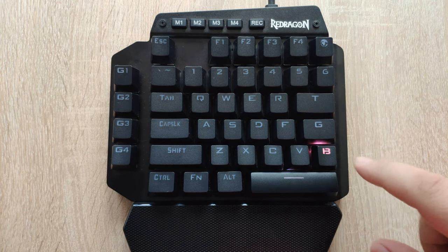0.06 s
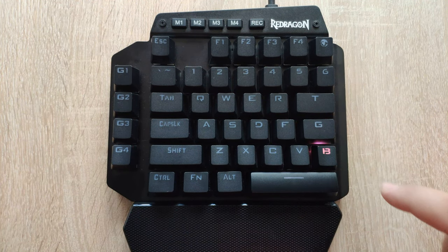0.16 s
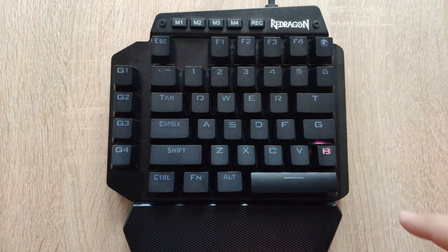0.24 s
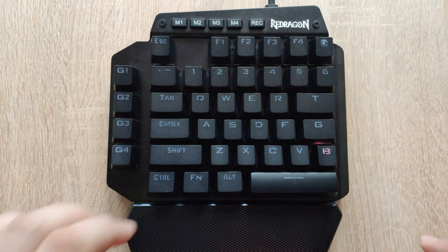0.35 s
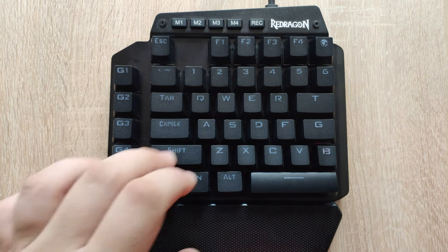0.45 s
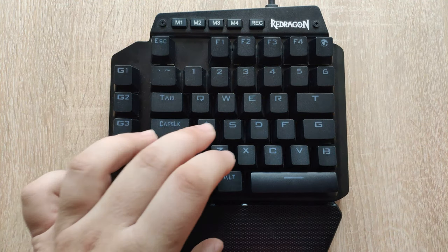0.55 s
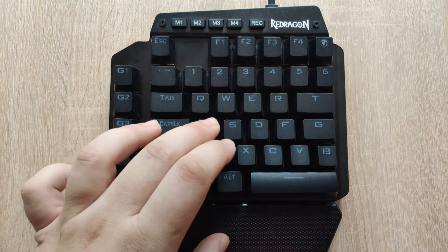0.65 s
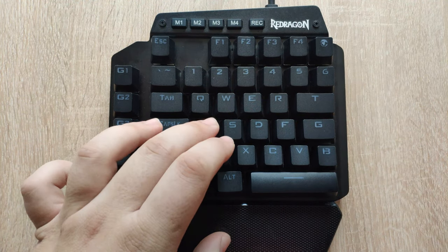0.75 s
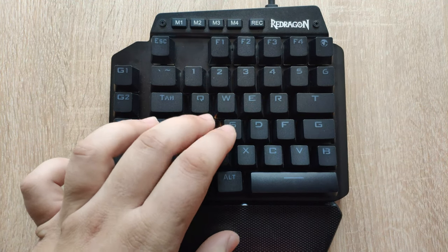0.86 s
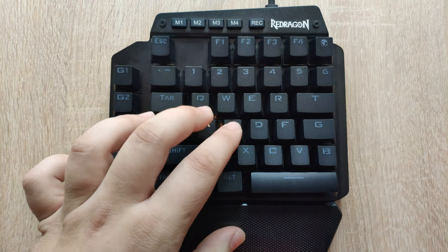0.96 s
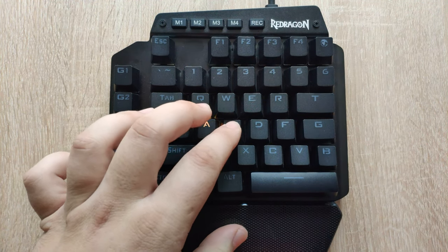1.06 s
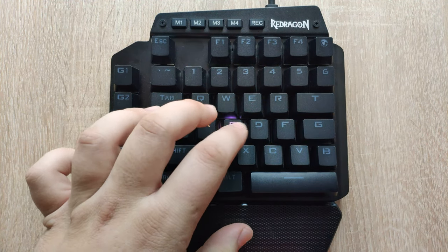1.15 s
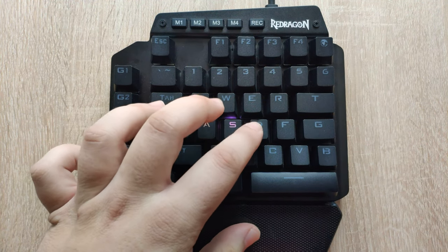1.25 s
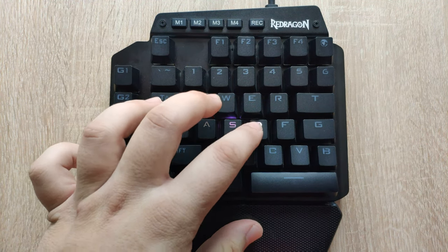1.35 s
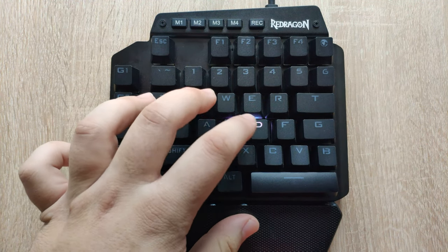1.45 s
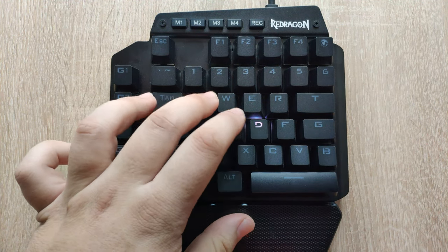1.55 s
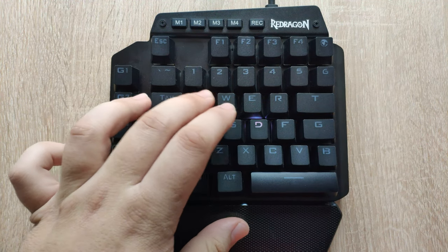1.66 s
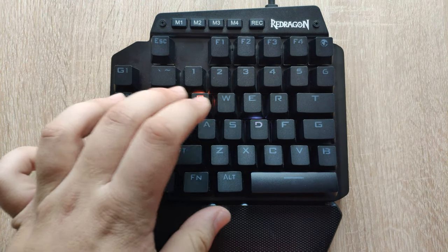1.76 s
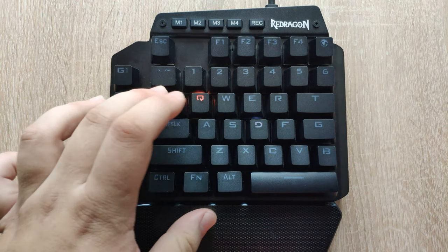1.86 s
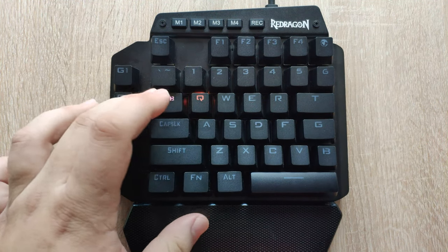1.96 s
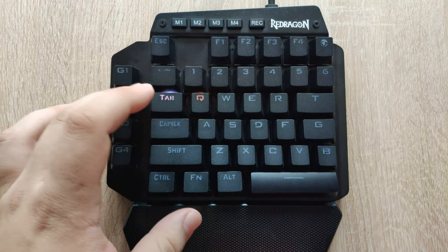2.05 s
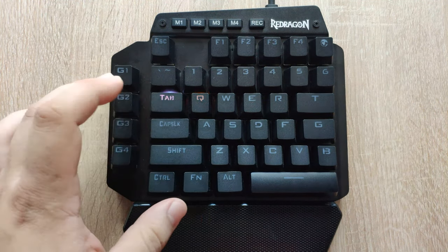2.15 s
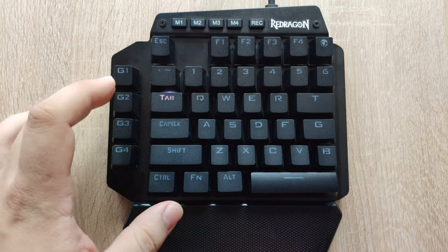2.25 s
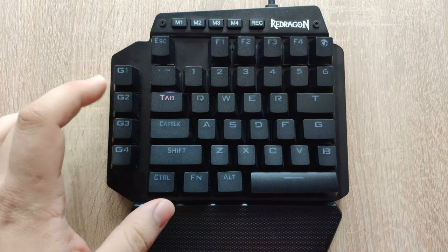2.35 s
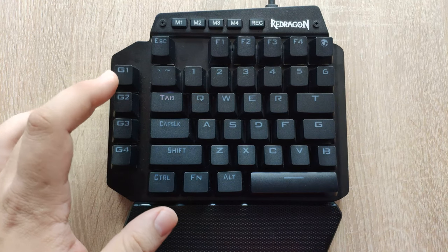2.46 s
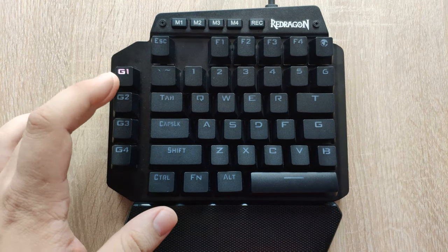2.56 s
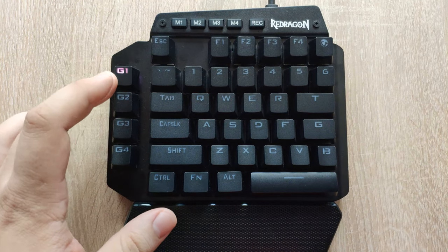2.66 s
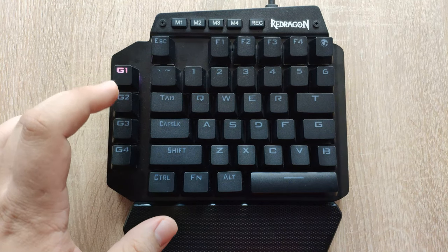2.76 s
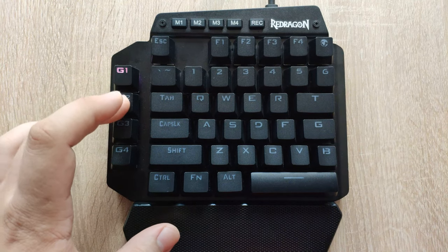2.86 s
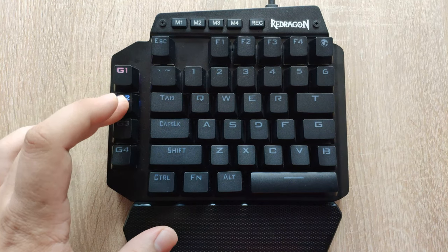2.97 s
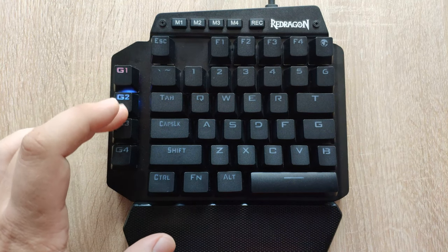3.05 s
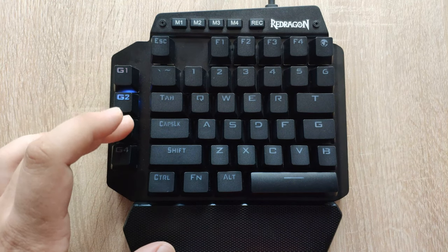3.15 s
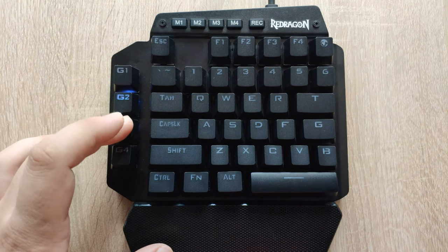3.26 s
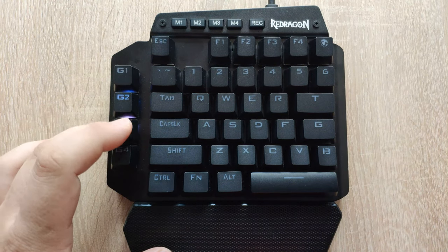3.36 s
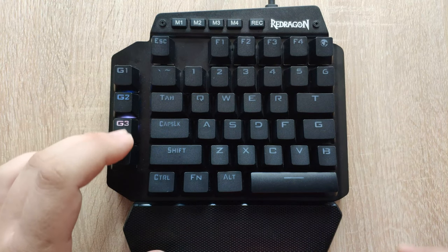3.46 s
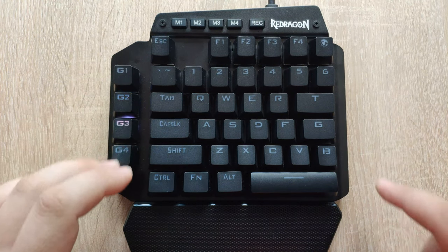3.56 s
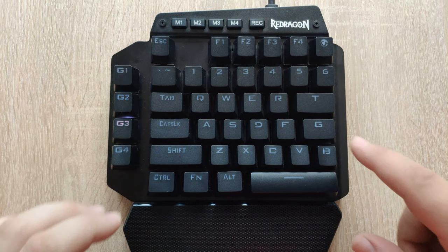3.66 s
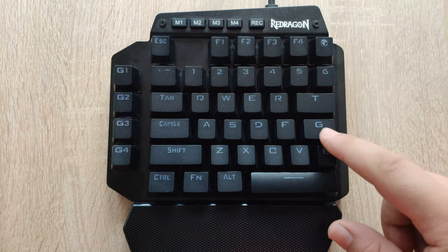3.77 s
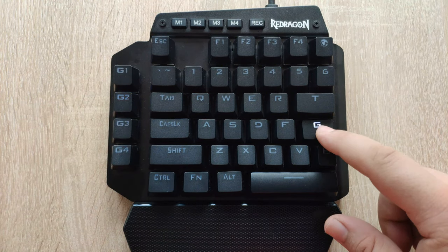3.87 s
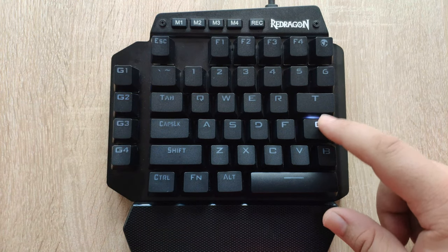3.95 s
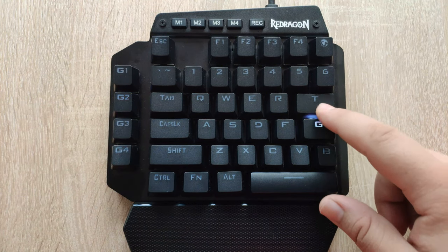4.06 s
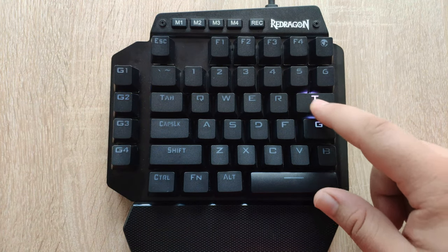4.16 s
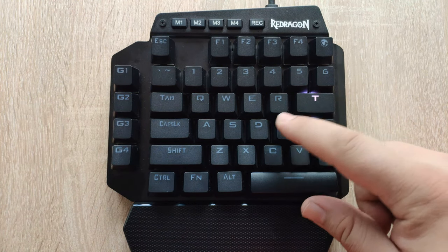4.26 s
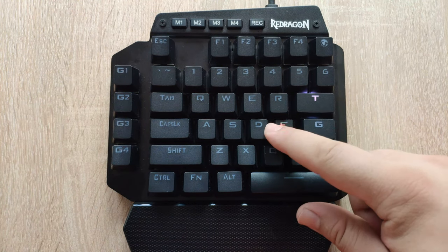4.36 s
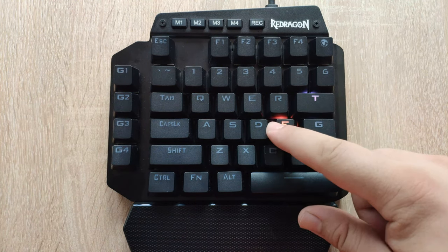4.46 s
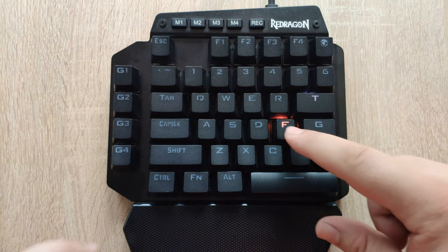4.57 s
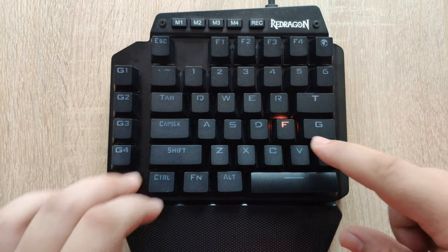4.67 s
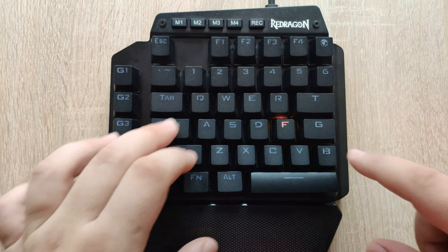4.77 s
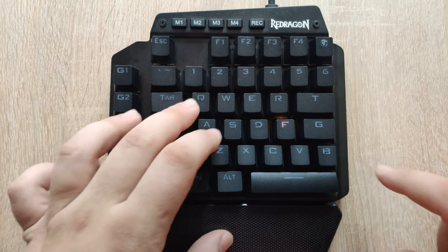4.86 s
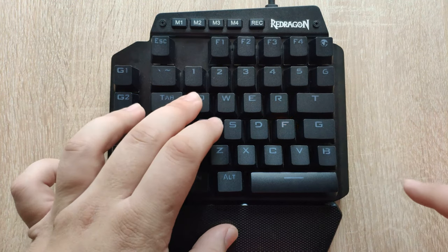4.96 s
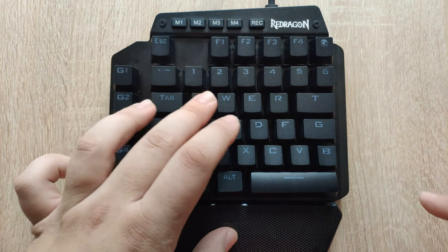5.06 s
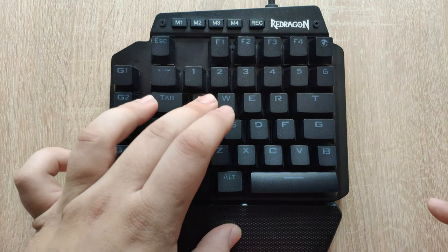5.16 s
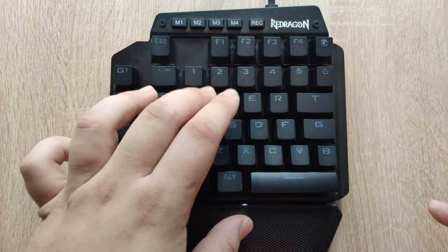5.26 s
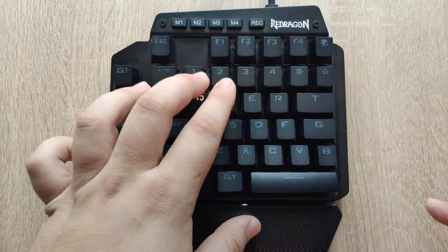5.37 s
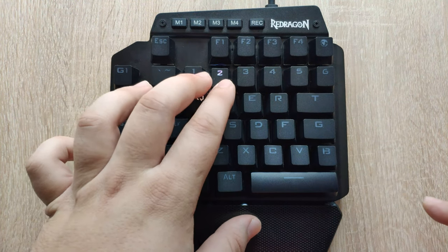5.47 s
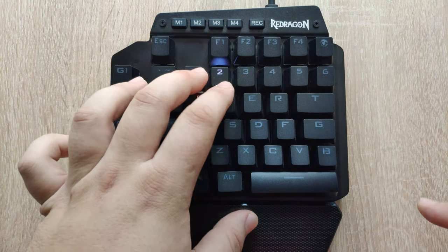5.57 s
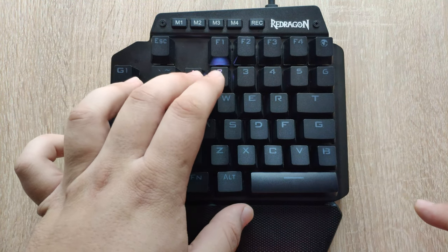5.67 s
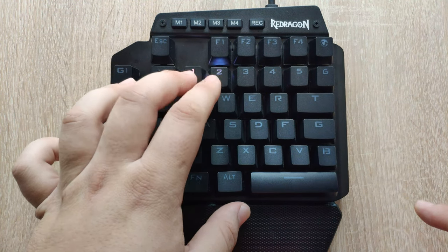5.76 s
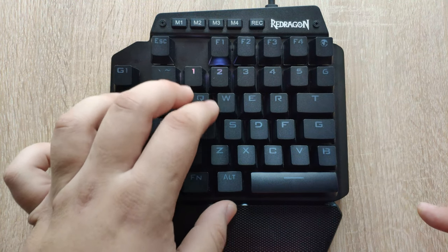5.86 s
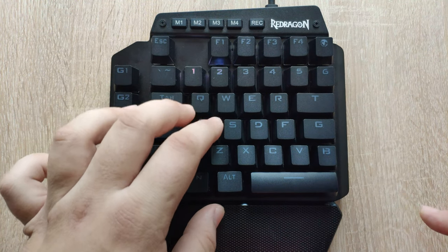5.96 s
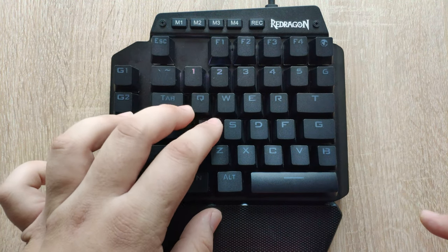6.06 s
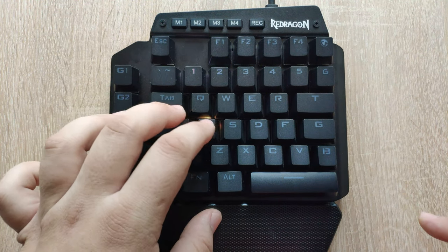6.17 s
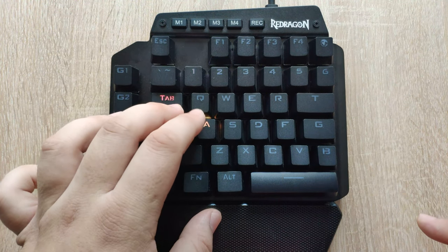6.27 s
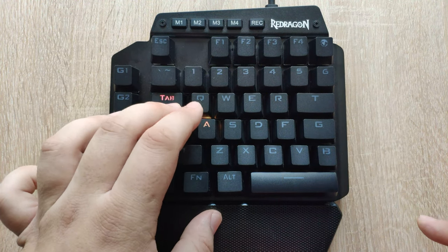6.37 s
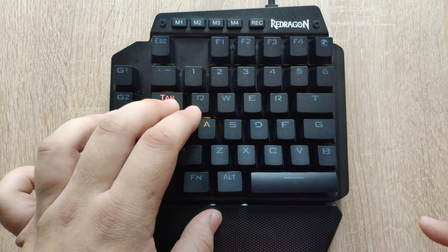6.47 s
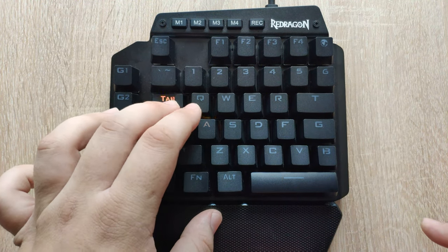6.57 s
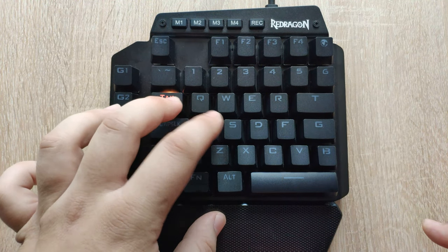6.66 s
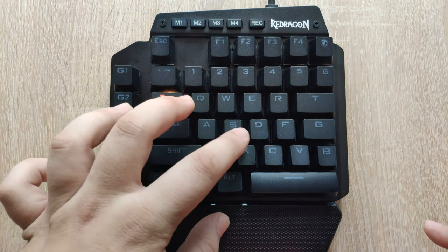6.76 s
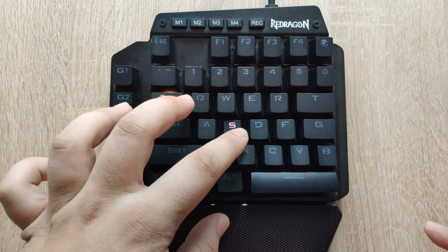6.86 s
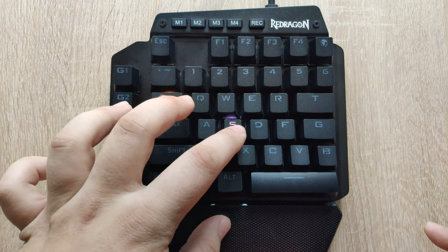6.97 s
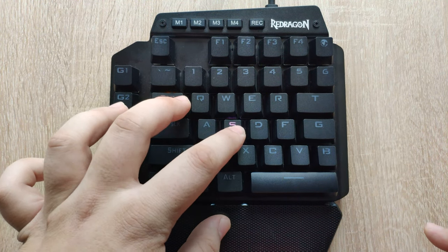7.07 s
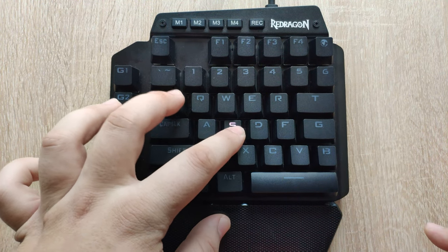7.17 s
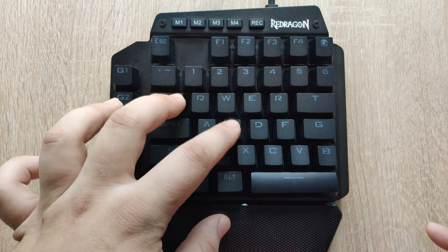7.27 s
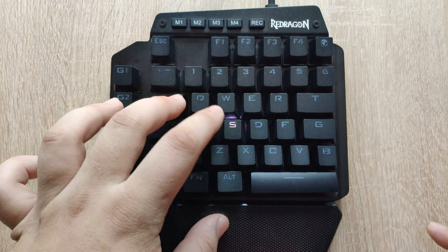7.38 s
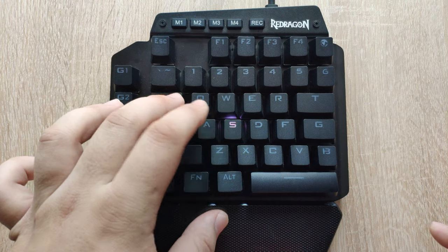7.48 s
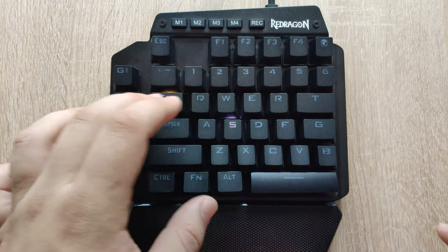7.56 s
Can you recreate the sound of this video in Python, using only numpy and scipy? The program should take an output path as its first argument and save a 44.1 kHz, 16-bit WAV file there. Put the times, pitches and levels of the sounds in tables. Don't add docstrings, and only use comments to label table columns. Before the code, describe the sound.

Close above a clicky mechanical keypad on a wooden desk in a small room, faint mains hum and hiss lie underneath. At the very start a key springs up with a weak knock, then the background sinks until about 0.7 s. Single presses follow at roughly 0.75, 1.05, 1.35, 1.65 and 2.0 s, then 2.6, 2.95 and 3.25 s: each a very bright, short snap, often with a dull plastic bottoming knock, then a softer release clack with a tiny tick. A brief hush near 3.8 s gives way to presses at 3.9, 4.15 and 4.45 s. Another lull falls around 4.7-4.9 s, before faint touches and releases. From 5.2 s snaps return, irregularly two to four a second, until 7.4 s, with a final soft release near 7.6 s. Finger nudges and loose ticks fill the gaps; a short diffuse room tail follows each click.

```python
import sys
import numpy as np
from scipy import signal
from scipy.fft import rfft, irfft, next_fast_len
from scipy.io import wavfile

SR = 44100
rng = np.random.default_rng(int(sys.argv[2]) if len(sys.argv) > 2 else 0)


def to_wav(s):
    ch = np.atleast_2d(s).T
    pcm = np.round(np.clip(ch, -1, 1) * 32767)
    wavfile.write(sys.argv[1], SR, pcm.astype(np.int16))


def attenuation_scalar(level_db):
    decades = np.asarray(level_db, float) / 20
    return 10 ** decades


N = 336042

# (time [s], strength [dB], ring [Hz], left-right [dB], housing share [dB])
PRESSES = [(0.7461, -11, 8580, -10, -4), (1.0509, -7, 8560, -11.5, -17.5), (1.346, -8, 8230, -16.5, -12),
           (1.642, -7, 8020, -19, -18), (1.9738, -24.5, 6400, -4, 3.5), (1.9825, -12.5, 8530, -12.5, -1.5),
           (2.6087, -12, 8100, -6.5, -6), (2.9588, -11, 8570, -3, -5), (3.251, -7.5, 8690, -10.5, -5),
           (3.8903, -13.5, 9130, -8.5, 0), (4.1421, -14.5, 8510, -2, 1), (4.431, -7, 8140, -6.5, -14.5),
           (5.1858, -7.5, 8500, -12, -25.5), (5.5036, -11.5, 8090, -26, -15), (5.669, -11, 8590, -8, -7),
           (6.0742, -8.5, 8350, -13, -9.5), (6.343, -12, 8170, -5, -0.5),
           (6.5769, -12.5, 8440, -10.5, -3.5), (6.8713, -13, 8070, -12, -14.5),
           (7.1791, -11.5, 8300, -8, -14), (7.369, -15.5, 8810, -4.5, -2)]
# (time [s], peak [dB], ring [Hz], low share [dB], tick [dB])
RELEASES = [(0.009, -40, 1460, -0.5, -43), (0.906, -26.5, 2160, -3.5, -47), (1.208, -17.5, 2467, -10, -27),
            (1.461, -22.5, 1420, -8, -37), (1.756, -23.5, 1070, -9.5, -34), (2.082, -22.5, 2200, -3, -39.5),
            (2.391, -31.5, 1735, -2.5, -50), (2.754, -26, 1740, -4, -39.5), (3.101, -28, 1460, -7, -46.5),
            (3.443, -30.5, 1460, -9, -43), (3.577, -28.5, 1844, -21.5, -38), (4.013, -28, 2480, -1, -36),
            (4.245, -27.5, 760, 1, -39), (4.495, -24.5, 1305, -24.5, -33.5),
            (4.523, -19.5, 2550, -7.5, -42), (4.896, -29.5, 2200, -3, -39.5), (5.083, -27, 1400, -19, -42),
            (5.31, -26.5, 2270, 1, -34.5), (5.836, -25, 2230, 0.5, -37.5), (6.193, -23.5, 1250, -8, -52.5),
            (6.484, -25.5, 2150, -3, -40), (6.707, -25.5, 2130, -3, -42.5), (7.009, -26, 2620, -6, -36),
            (7.575, -25.5, 1080, -3.5, -48.5)]
# (frequency [Hz], level [dB], t60 [s])
HOUSING_MODES = [(3770, -2.5, 0.0016), (4860, -4.5, 0.0018), (5940, -5, 0.0005), (6485, 2, 0.0023)]
# (frequency [Hz], level [dB], t60 [s])
CASE_MODES = [(340, -21.5, 0.008), (432, -11, 0.0077), (526, -5.5, 0.02), (644, 4, 0.027),
              (843, 3.5, 0.019), (1070, 8.5, 0.016), (1250, 0, 0.027), (1460, 6.5, 0.016)]
ROOM_SMOOTH_DB = -6


def at_hz(points, hz, axis=1):
    table = np.array(points)
    return np.interp(np.log(np.maximum(hz, 1)), np.log(table[:, 0]), table[:, axis])


def ring(push, hz, t60):
    r, w = attenuation_scalar(-60 / (t60 * SR)), 2 * np.pi * hz / SR
    return signal.lfilter([0, np.sin(w)], [1, -2 * r * np.cos(w), r * r], push + 1e-18)


def shaped(x, gain):
    size = next_fast_len(x.shape[-1])
    spectrum = rfft(x, size) * gain(np.fft.rfftfreq(size, 1 / SR))
    return irfft(spectrum, size)[..., :x.shape[-1]]


def peak_one(x):
    return x / np.abs(x).max()


def add(out, s, sound, pan_db):
    i = round(s * SR)
    out[:, i:i + len(sound)] += sound[:N - i] * attenuation_scalar(np.array([[.5], [-.5]]) * pan_db)


def contact(noise, rattle_s, rattle_db):
    push = attenuation_scalar(rattle_db) * noise * np.exp(-np.arange(len(noise)) / SR / rattle_s)
    push[0] = 1
    return push


def snap_rows():
    # (time [s], peak [dB])
    jacket_ticks = [(0.6738, -51), (0.8732, -33.5), (0.9867, -46.5), (1.038, -44.5), (1.3125, -39),
                    (1.5793, -37.5), (1.942, -61.5), (2.592, -52.5), (2.9117, -44), (3.0941, -29.5),
                    (3.4358, -42), (3.8544, -57), (3.8751, -44.5), (3.991, -34), (4.1076, -51),
                    (4.226, -28.5), (4.4087, -28.5), (4.518, -37), (4.9308, -42), (5.0379, -58.5),
                    (5.054, -42), (5.4262, -51), (5.6082, -39.5), (5.6476, -34.5), (5.814, -37),
                    (6.056, -54.5), (6.5678, -44), (6.8129, -43.5), (7.5386, -42), (7.5642, -38.5),
                    (1.189, -41.5),
        (1.44, -47),
        (2.72, -41),
        (4.846, -51),
        (5.88, -49.5),
        (6.161, -55),
        (6.46, -44.5),
        (6.69, -36),
        (6.98, -39),
        (7.345, -38),
    ]
    direct_db, direct_per_pan = 3, 0.45
    release_lead_s = .0015
    catch_lead_s, catch_spread_s, catch_db = .012, 0.0052, -40.5
    tick_hz, tick_spread_hz, tick_room_db, tick_housing_db = 8660, 750, 3, 1.5
    rows = []
    for s, db, hz, pan, housing_db in PRESSES:
        direct = direct_db + direct_per_pan * pan
        rows.append((s, db + direct, hz, pan, -direct, housing_db))
    ticks = jacket_ticks
    ticks += [(s - release_lead_s, tick_db) for s, *_, tick_db in RELEASES]
    for (s, db, *_), d in zip(PRESSES, rng.standard_normal(len(PRESSES))):
        ticks.append((s - catch_lead_s + catch_spread_s * d, db + catch_db))
    when, _, _, where, _ = np.transpose(PRESSES)
    for (s, db), d in zip(ticks, rng.standard_normal(len(ticks))):
        pan = np.interp(s, when, where)
        rows.append((s, db, tick_hz + tick_spread_hz * d, pan, tick_room_db, tick_housing_db))
    return rows


def snap(grit, own, hz, housing_db, top_db):
    push = contact(grit, 0.0017, -9.5)
    jacket = ring(ring(push, hz, 0.0017), hz, 0.0017)
    housing = 0
    for k, ((f, db, t60), d) in enumerate(zip(HOUSING_MODES, own)):
        housing = housing + attenuation_scalar(db + 1.5 * d) * ring((-1) ** k * push, f, t60)
    air = signal.butter(2, [10300, 17500], "band", fs=SR)
    top = signal.lfilter(*air, contact(grit[::-1], .0014, -7))
    return (peak_one(jacket) + attenuation_scalar(housing_db - 5.5) * peak_one(housing)
            + attenuation_scalar(0.19 * housing_db - 3 + top_db) * peak_one(top))


def snaps():
    top_per_pan = .3
    near, far = np.zeros((2, 2, N))
    rows = snap_rows()
    noise = rng.standard_normal((len(rows), 1500))
    spread = rng.standard_normal((len(rows), len(HOUSING_MODES)))
    for (s, peak_db, hz, pan_db, room_db, housing_db), grit, own in zip(rows, noise, spread):
        top_db = top_per_pan * pan_db
        direct = snap(grit, own, hz, housing_db, top_db)
        diffuse = snap(grit * attenuation_scalar(ROOM_SMOOTH_DB), own, hz, housing_db, top_db)
        add(near, s, attenuation_scalar(peak_db - 4.0) * direct, 1.08 * (pan_db + 7.5))
        add(far, s, attenuation_scalar(peak_db + room_db) * diffuse, 0)
    return near, far


def knock_rows():
    # (time [s], peak [dB], ring [Hz], low share [dB], room [dB])
    bottoms = [(0.761, -19.5, 2133, -11, -4.5), (1.063, -16.5, 2310, -15.5, -2.5),
               (1.997, -15, 2180, -16.5, -4.5), (2.624, -23, 1590, -22, -0.5),
               (2.975, -23, 1720, -40, -2.5), (3.261, -14, 1715, -25, -7.5), (3.903, -20, 2520, -8, -4),
               (4.158, -27, 2521, -3, 1.3), (5.656, -22.5, 1070, -11, -4), (5.699, -31, 2360, -9, -10),
               (6.088, -28, 1880, -15.5, -1.5), (6.59, -17, 2120, -12.5, -5.5),
               (7.196, -28, 2660, -9.5, -4.5), (7.38, -13, 2080, -15.5, -5)]
    # (time [s], peak [dB], ring [Hz], low share [dB])
    touches = [(0.673, -45, 1490, -14), (0.878, -41.5, 2580, -2), (0.986, -38, 1450, -4),
               (1.426, -44.5, 2460, 0), (1.578, -36.5, 2500, -2.5), (1.912, -30, 1070, -45),
               (2.531, -42, 1550, -14.5), (2.911, -40.5, 1460, -6), (3.203, -36, 1520, -12),
               (4.106, -36, 1100, -2), (4.24, -27, 2560, 3.5), (4.405, -36, 1460, -5.5),
               (4.487, -40.5, 2570, 2), (4.931, -35.5, 2220, 2), (5.04, -35, 2290, -1),
               (5.056, -35.5, 2400, 0), (5.073, -28, 2320, -8), (5.15, -38.5, 2410, -2),
               (5.434, -36.5, 1070, -9), (5.592, -41, 1340, -46), (5.635, -38, 2480, -2),
               (5.873, -41.5, 1030, 4), (5.883, -31.5, 1070, -6.5), (6.005, -42.5, 1520, -8),
               (6.176, -40, 2250, -6), (6.185, -30.5, 2190, -7), (6.813, -35, 2300, -2.5),
               (6.953, -39.5, 1550, -39), (7.229, -28.5, 2130, -0.3), (7.568, -28.5, 1080, -19)]
    jolt_lead_s = 0.001111
    jolt = (-35, 2310, -15, -2.5, -2)
    bottom_crackle_db = -18.5
    release_room_db, release_crackle_db = -4, -22.5
    touch_room_db, touch_crackle_db = -2.5, -23
    return ([(s - jolt_lead_s, *jolt) for s, *_ in PRESSES]
            + [(*row, bottom_crackle_db) for row in bottoms]
            + [(*row, release_room_db, release_crackle_db) for *row, _ in RELEASES]
            + [(*row, touch_room_db, touch_crackle_db) for row in touches])


def knock(grit, own, hz, low_db, crackle_db):
    soft = signal.butter(2, 3800, fs=SR)
    crisp = signal.butter(2, [3000, 6500], "band", fs=SR)
    airy = signal.butter(2, 6000, "high", fs=SR)
    push = signal.lfilter(*soft, contact(grit, 0.0069, -23.5))
    lag = round(max(round(.0016 * hz), 1) * SR / hz)
    push[lag:] += 0.16 * push[:-lag]
    cap = ring(ring(push, hz, 0.0035), hz, 0.0035) / 7
    cap = cap + attenuation_scalar(-4.5) * ring(push, 2270, 0.0064)
    cap = cap - attenuation_scalar(-1.0) * ring(push, 1100, 0.00054) - attenuation_scalar(-4) * ring(push, 3200, 0.00047)
    case = 0
    for (f, db, t60), d in zip(CASE_MODES, own):
        case = case + attenuation_scalar(db + 3 * d) * ring(np.sign(d) * push, f, t60)
    crackle = signal.lfilter(*crisp, contact(grit[::-1], .003, -13))
    age = np.arange(len(grit)) / SR / 0.0031
    scuff = signal.lfilter(*airy, grit) * age * np.exp(-age)
    crackle = peak_one(crackle) + attenuation_scalar(-6.5) * scuff
    return peak_one(cap) + attenuation_scalar(low_db + 3.5) * peak_one(case) + attenuation_scalar(crackle_db) * crackle


def knocks():
    # (frequency [Hz], level [dB], t60 [s])
    plate_modes = [(606, -36, 1.2), (1736, -48, .4), (2165, -46, .4), (2298, -42, .6)]
    room_crackle_db = -3.5
    near, far = np.zeros((2, 2, N))
    blows = np.zeros(N)
    rows = knock_rows()
    noise = rng.standard_normal((len(rows), 4000))
    spread = rng.standard_normal((len(rows), len(CASE_MODES)))
    for (s, peak_db, hz, low_db, room_db, crackle_db), grit, own in zip(rows, noise, spread):
        crackle_db = min(crackle_db, -3) + 9.5
        direct = knock(grit, own, hz, low_db, crackle_db)
        diffuse = knock(grit * attenuation_scalar(ROOM_SMOOTH_DB), own, hz, low_db, crackle_db + room_crackle_db)
        add(near, s + 0.001174, attenuation_scalar(peak_db - 5.5) * direct, -.8)
        add(far, s + 0.00117, attenuation_scalar(peak_db + room_db) * diffuse, 0)
        blows[round(s * SR)] = attenuation_scalar(peak_db + 3.0 + low_db)
    no_bass = signal.butter(2, 300, "high", fs=SR, output="sos")
    near, far = signal.sosfilt(no_bass, [near, far])
    plate = sum(attenuation_scalar(db) * ring(blows, f, t60) for f, db, t60 in plate_modes)
    return near + plate, far


def room(x):
    # (frequency [Hz], t60 [s])
    decay = [(300, 0.23), (800, 0.25), (2100, 0.49), (4000, 0.36), (8500, 0.41), (14600, 0.27)]
    # (frequency [Hz], level [dB])
    reverb_level = [(300, 6.5), (1000, 0), (2500, -5.5), (5000, -0.5), (8500, -6.5), (12000, -2.5),
                    (15000, -5)]
    t, tail = np.arange(SR // 2) / SR, 0
    white = rng.standard_normal((2, 2, SR // 2))
    edges = 200 * 2 ** np.arange(0, 6.6, .5)
    for k, (low, high) in enumerate(zip(edges, edges[1:])):
        centre = np.sqrt(low * high)
        band_pass = signal.butter(2, [low, high], "band", fs=SR, output="sos")
        band = signal.sosfilt(band_pass, white[k % 2])
        band[1] += band[0] * 0.75 * np.exp(-low / 1200)
        band /= band.std(axis=1, keepdims=True) / np.sqrt(low / SR)
        t60 = at_hz(decay, centre)
        fall = attenuation_scalar(at_hz(reverb_level, centre) - 60 * t / t60)
        tail = tail + band * fall / np.sqrt(t60 * SR / 4.78)
    tail *= np.clip((t - .002) / 0.002, 0, 1)
    return signal.fftconvolve(x.mean(0, keepdims=True), tail, axes=1)[:, :N]


def rooms(x):
    turn = 2 * np.pi * 2.3 * np.arange(N) / SR
    return sum(room(x * np.sqrt((1 + np.cos(turn - 2 * np.pi * k / 3)) / 3)) for k in range(3))


def background():
    # (frequency [Hz], rms level [dB])
    tones = [(100, -61), (200, -66.5), (13232, -91), (14890, -84.5)]
    # (frequency [Hz], density [dB per Hz])
    hiss_spectrum = [(22, -51.5), (46, -4.5), (65, -15.5), (92, -8.5), (167, -10.5), (208, -5),
                     (358, -19.5), (568, -21.5), (617, -11.5), (706, -23.5), (2750, -37.5), (6210, -47.5),
                     (16500, -39.5)]
    hiss_db = -70.5
    t = np.arange(N) / SR
    hum = sum(np.sqrt(2) * attenuation_scalar(db) * np.sin(2 * np.pi * hz * t) for hz, db in tones)
    mid, side = rng.standard_normal((2, N))
    side = shaped(side, lambda hz: np.clip(0.18 + hz / 2500, 0, 1))
    hiss = shaped(mid + side * [[1], [-1]], lambda hz: attenuation_scalar(at_hz(hiss_spectrum, hz)))
    return hum + attenuation_scalar(hiss_db + 10.5) * hiss / hiss.std()


def scene():
    near, far = snaps()
    thud, far_thud = knocks()
    quiet = rooms(far + far_thud) + background()
    return near + thud + shaped(quiet, lambda hz: hz < 15900)


def through_ports(x):
    # (frequency [Hz], left [dB], right [dB])
    colour = [(102, -1, -3), (1080, 3, 4), (2920, 12, 13), (6020, 13.5, 3.5), (8890, -3.5, 12.5),
              (10470, -10.5, 3), (12970, -3.5, 3), (15640, 2, 8.5)]
    # (frequency [Hz], lag [s])
    right_lag = [(400, .00006), (2400, .00008), (8000, .00016)]

    def response(hz):
        level = attenuation_scalar([at_hz(colour, hz, axis=1), at_hz(colour, hz, axis=2)])
        return level * np.exp(-2j * np.pi * hz * at_hz(right_lag, hz) * [[0], [1]])

    return shaped(x, response)


def gate(open_db, shut_db, half_db):
    # (starts to sink [s], shut [s], a finger half opens it [s], open [s])
    pauses = [
        (.17, 0.246, .66, .74),
        (3.672, 3.807, 3.845, 3.892),
        (4.674, 4.822, 4.83, 4.893),
    ]
    half_s = 0.013
    s = [[sink, down, touch, touch + half_s, up] for sink, down, touch, up in pauses]
    levels = [open_db, shut_db, shut_db, half_db, open_db] * len(pauses)
    return attenuation_scalar(np.interp(np.arange(N) / SR, np.ravel(s), levels))


def slow_gain():
    # (time [s], level [dB])
    gain = [
        (0, 8.5),
        (.17, -0.5),
        (.74, -2),
        (3.7, -2.5),
        (5.002, -2.5),
        (7.62, 2.5),
    ]
    return attenuation_scalar(np.interp(np.arange(N) / SR, *np.transpose(gain)))


def top_cut(x):
    return signal.sosfilt(signal.butter(12, 17020, fs=SR, output="sos"), x)


def record(dry):
    x = through_ports(dry)
    bass = shaped(x, lambda hz: 1 / (1 + (hz / 350) ** 2))
    treble = (x - bass) * gate(open_db=-1.5, shut_db=-17.5, half_db=-4) * slow_gain()
    x = bass * gate(open_db=-5, shut_db=-16.5, half_db=-16) + treble
    rounded = .75 * np.tanh(x / .75)
    low_pass = signal.cheby2(10, 60, 17300, fs=SR, output="sos")
    return top_cut(signal.sosfilt(low_pass, rounded))


dry = scene()
out = record(dry)
to_wav(out)
```